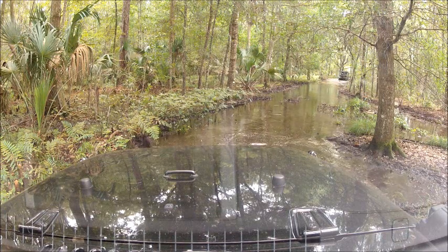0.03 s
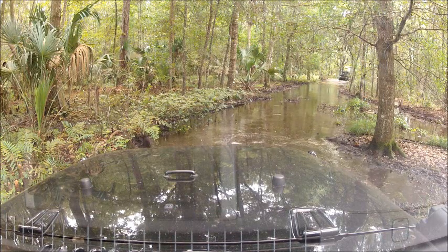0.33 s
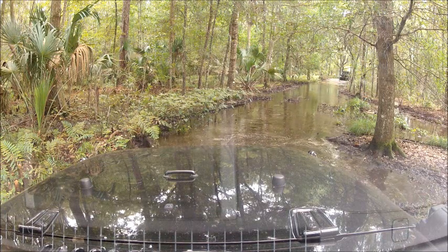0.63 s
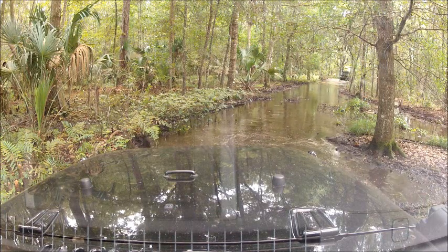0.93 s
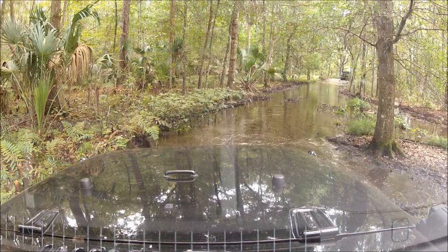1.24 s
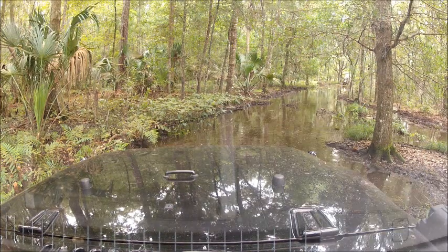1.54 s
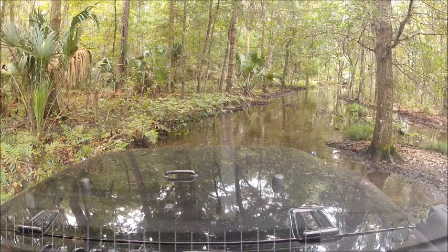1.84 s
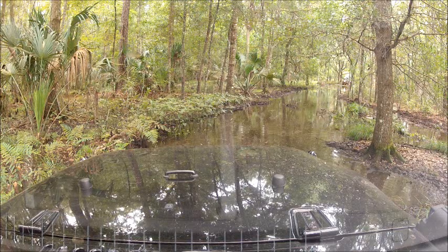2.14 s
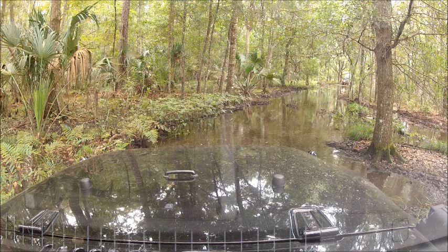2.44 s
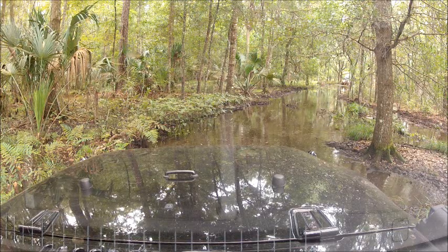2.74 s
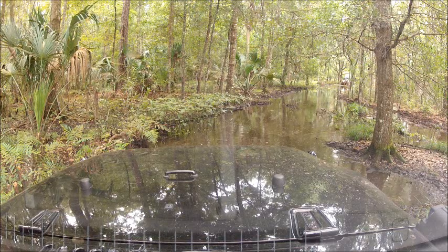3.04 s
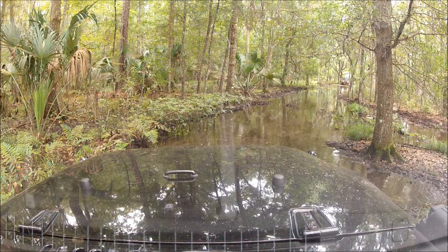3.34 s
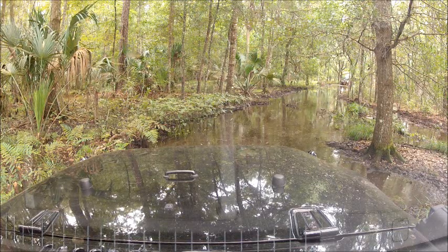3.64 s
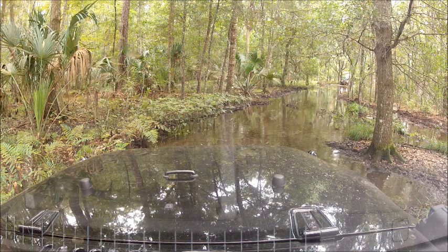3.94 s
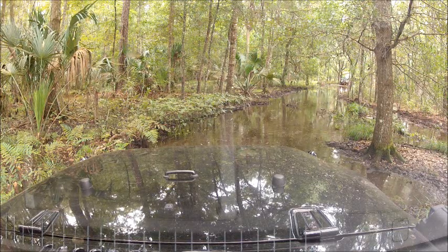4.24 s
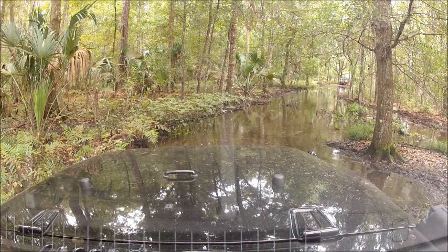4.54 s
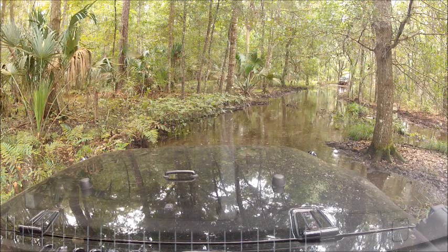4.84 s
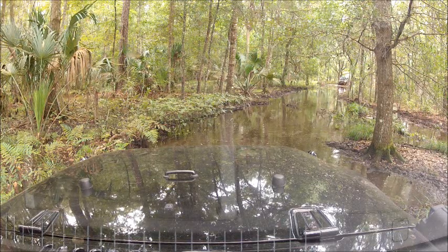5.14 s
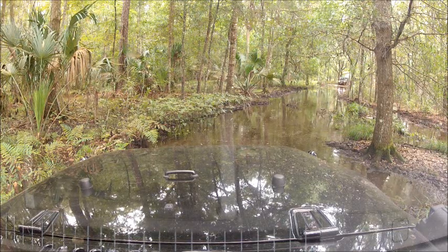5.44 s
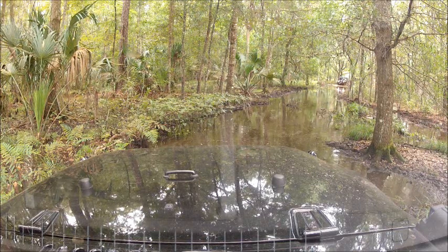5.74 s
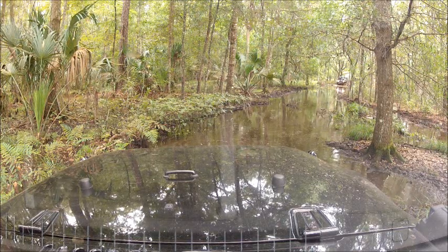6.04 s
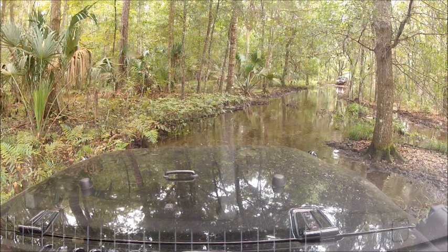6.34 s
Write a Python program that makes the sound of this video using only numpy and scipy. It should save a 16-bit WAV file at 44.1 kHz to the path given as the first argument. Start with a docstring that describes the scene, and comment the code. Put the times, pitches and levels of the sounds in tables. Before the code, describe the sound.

Heard on board, an off-road vehicle idles with light ticks and soft knocks until its door slams shut with a boom.

```python
"""A door slams on an idling off-road vehicle: panels ring, the latch snaps, fittings rattle, the cabin booms.
Before the slam, the sound cuts abruptly from a fast six-cylinder idle to a slower, quieter one.
Small parts tick, something rustles and the bodywork knocks softly over a faint hiss.
All is heard on board through a slow converter, whose images mirror the sound into the treble;
the slam overloads it."""
import sys
import numpy as np
from scipy import signal
from scipy.fft import rfft, irfft, next_fast_len
from scipy.io import wavfile
from scipy.ndimage import uniform_filter1d

SR = 44100
rng = np.random.default_rng(int(sys.argv[2]) if len(sys.argv) > 2 else 0)


def transcribe(u):
    """Save the signal u as a 16-bit wav file named by the first command-line argument.

    u: samples, shape (n,) or (channels, n), limited to [-1, 1]; the rate is SR.
    q: integer samples, one column per channel.
    """
    v = np.clip(np.atleast_2d(u).T, -1, 1)
    q = np.round(v * 32767).astype(np.int16)
    wavfile.write(sys.argv[1], SR, q)


N = 286666
T = np.arange(N) / SR
CUT_S, SLAM_S = 1.657, 5.252  # the sound cuts; the door shuts

# Noise spectra. Each row: frequency in Hz, relative spectral density in dB.
HISS_SPECTRUM = [(300, -27), (1200, 8.5), (2200, 0.5), (3700, 3), (5000, 3), (6000, -5)]
RUSTLE_SPECTRUM = [(700, -10), (1500, -1), (2050, 6), (2800, -1), (4500, 0), (6000, -7.5)]
TICK_SPECTRUM = [(500, -18), (1800, -11.5), (3300, -9), (4500, 1.5), (6000, -4)]
FAST_RUMBLE = [(8, -31), (30, -2), (65, -1.5), (140, -1), (220, -4.5), (330, -6.5), (390, -8), (560, -12),
               (820, -15.5), (1150, -24.5), (1700, -35), (4000, -41)]
SLOW_RUMBLE = [(8, -22), (30, -1), (65, 3.5), (110, -3.5), (250, -3), (330, -2), (410, -13.5), (500, -12.5),
               (680, -18), (830, -18.5), (1000, -26.5), (1300, -30), (1900, -38), (4000, -37)]
SHUDDER_SPECTRUM = [(20, -4), (45, 5.5), (90, 3.5), (150, 3), (200, -9), (330, -7), (430, -11.5),
                    (700, -23.5), (1100, -27), (1800, -37), (5000, -53)]
CLATTER_SPECTRUM = [(150, -6), (400, 9), (700, 3), (1100, 4), (1700, -3.5), (2600, -4), (3200, -1.5),
                    (3900, -0.5), (5000, -3), (6000, -6)]
# Normal modes. Each row: frequency in Hz, relative level in dB, time to decay by 60 dB in seconds.
SMALL_PART_MODES = [(467, -7, .05), (716, -8.5, 0.049), (1350, -17, 0.022), (2320, -10, 0.04),
                    (2910, -4, 0.035), (3170, -19, .1), (3650, -18.5, .1), (4970, -5.5, 0.054)]
CABIN_MODES = [(27.63, -6, 1.09), (57.05, -1.5, 0.47), (73.8, -5.5, 0.67), (89.6, -9.5, 0.735)]
LATCH_MODES = [(2164, -2, 0.058), (2694, -5, 0.073), (3000, -6, 0.026), (3360, -6, 0.042),
               (3550, -6.5, 0.054), (3853, -1.5, 0.073), (4080, -4, 0.057), (4460, -9, 0.023),
               (4900, -19, .05)]
PANEL_MODES = [(129, -11, 0.61), (160.9, -11.5, 0.46), (228.5, -10.5, 0.35), (273, -18, 0.17),
               (292, -4, 0.244), (315.4, -5.5, 0.21), (343, -3, 0.078), (480, -13, .1), (529, -13, 0.204),
               (672, -8, 0.11), (710, -10, 0.14), (794, -11, 0.14), (862, -16.5, 0.13), (1038, -13.5, 0.15),
               (1180, -13, 0.1), (1255, -12.5, 0.1), (1405, -12, 0.041)]
# Rustles, from scuff to tap. Each row: start in seconds, level in dB, rise time in seconds.
RUSTLES = [(2.03, -59, .03), (2.28, -49, .045), (2.372, -53, .015), (2.546, -48, .003)]
# Contacts of small parts, and of the latch. Each row: start in seconds, level in dB.
TICKS = [(.150, -47.5), (.236, -37), (0.333, -26), (.391, -46), (.639, -46), (.812, -49), (.846, -47),
         (1.253, -54), (1.724, -41), (3.52, -50)]
LATCH_HITS = [(5.2505, -19.5), (5.2550, -16), (5.2635, -28), (5.2905, -18.5), (5.2955, -29)]
# Hollow bumps of the bodywork. Each row: start in seconds, pitch in Hz, level in dB.
BUMPS = [(2.803, 343, -25.5), (2.957, 262, -30), (3.098, 289, -27), (5.435, 339.6, -11.5),
         (5.462, 250, -22), (5.497, 339, -18.5), (5.548, 356, -24.5), (6.036, 336, -31.5)]
# Hums of belt-driven parts. Each row: frequency in Hz, rms level in dB.
BELT_HUMS = [(147, -50.5), (183, -49.5), (220, -48), (293, -50), (390, -57), (513, -57.5)]
# Engine orders at each idle. Each row: multiple of the crank rate, rms level in dB.
FAST_ORDERS = [(2, -41), (3, -23.7), (4.5, -46.5), (6, -42.5), (7.5, -52), (9, -46.5), (16.5, -55)]
SLOW_ORDERS = [(2, -58), (3, -38), (4.5, -50), (6, -51), (10, -53), (15, -51)]
# The door meets latch and frame, then rebounds.
# Each row: start in seconds, panel level in dB, clatter level in dB.
DOOR_BLOWS = [(5.244, -22, -15.5), (5.252, -3.5, -11.5), (5.288, -17, -16), (5.362, -24.5, -32),
              (5.437, -19.5, -22.5), (5.498, -23.5, -26.5), (5.553, -30.5, -47)]


def undb(db):
    """Amplitude grows tenfold with every 20 dB."""
    return 10 ** (np.asarray(db) / 20)


def unit(x):
    """Normalisation to an rms of 1."""
    return x / np.sqrt(np.mean(x ** 2))


def filtered(x, gain):
    """Filtering multiplies the spectrum by gain(Hz); mirrored ends keep the edges smooth."""
    size = next_fast_len(N + 2 * SR)
    padded = np.pad(x, (SR, size - N - SR), mode="reflect")
    hz = np.arange(size // 2 + 1) * SR / size
    return irfft(rfft(padded) * gain(hz), size)[SR:SR + N]


def noise(spectrum, envelope=1):
    """White noise, amplitude-modulated and then spectrally shaped, with an rms of 1."""
    hz, db = np.transpose(spectrum)
    white = rng.standard_normal(N) * envelope
    return unit(filtered(white, lambda f: undb(np.interp(np.log(f + 1), np.log(hz), db))))


def drift(rate_hz):
    """Smoothed random steps give a fluctuation with an rms of 1."""
    step = int(SR / rate_hz)
    held = np.repeat(rng.standard_normal(N // step + 1), step)[:N]
    return unit(uniform_filter1d(uniform_filter1d(held, step), step))


def burst(start, rise_s, t60_s):
    """A transient's envelope: linear rise, then exponential decay, one second in all."""
    out, age = np.zeros(N + SR), T[:SR]
    decay = undb(-60 * np.clip((age - rise_s) / t60_s, 0, 2))
    out[int(start * SR):][:SR] = np.minimum(age / rise_s, 1) * decay
    return out[:N]


def strike(hits, modes, detune=0., contact_s=0.00016):
    """Each impact (s, dB) excites damped modes; a longer contact softens the attack."""
    out, age = np.zeros(N + SR), T[:SR]
    hz, db, t60 = np.transpose(modes)[:, :, None]
    envelopes = undb(db - 60 * np.minimum(age / t60, 3)) * np.minimum(age / contact_s, 1)
    for start, hit_db in hits:
        shift = detune * rng.standard_normal((len(modes), 1))  # by where the hit lands
        ring = envelopes * np.sin(2 * np.pi * hz * (1 + shift) * age)
        out[int(start * SR):][:SR] += undb(hit_db) * ring.sum(axis=0)
    return out[:N]


def hiss():
    """Broadband noise steps up at the cut and down when the door shuts."""
    level_db = np.select([T < CUT_S, T < SLAM_S], [-59.7, -56], -63.5)
    return noise(HISS_SPECTRUM) * undb(level_db)


def rustles():
    """The friction of light brushing gives fine-grained noise."""
    grains = noise(RUSTLE_SPECTRUM, envelope=undb(1.5 * drift(300)))
    return grains * sum(undb(db) * burst(start, rise, t60_s=.22) for start, db, rise in RUSTLES)


def ticks():
    """Light contacts radiate short scrapes; one also excites the modes of a small metal part."""
    clink_s, ring_db, scrape_db = 1.3442, -23, -37
    contacts = TICKS + [(clink_s, scrape_db)]
    scrapes = sum(undb(db) * burst(start, rise_s=.0016, t60_s=.082) for start, db in contacts)
    return scrapes * noise(TICK_SPECTRUM) + strike([(clink_s, ring_db)], SMALL_PART_MODES)


def bumps():
    """Soft, uneven contacts excite a damped panel resonance whose pitch wanders."""
    wander_rad, uneven = 0.59 * drift(110), undb(2 * drift(180))
    out = 0
    for start, hz, db in BUMPS:
        tone = np.sin(2 * np.pi * hz * (T - start) + wander_rad)
        out += undb(db) * burst(start, rise_s=.012, t60_s=.085) * tone
    return uneven * out


def belt_hums():
    """Steady rotation of belt-driven parts gives tones that waver slightly in level and phase."""
    out = 0
    for hz, db in BELT_HUMS:
        amplitude = np.sqrt(2) * undb(db + 2 * drift(6.06))
        out += amplitude * np.sin(2 * np.pi * hz * T + 0.66 * drift(6.96))
    return out


def idle(firing_hz, orders, spectrum, rumble_db, throb, waver_db):
    """Periodic firing gives tones at the crank orders and modulates the rumble of block and body."""
    firings = np.cumsum(firing_hz * (1 + .004 * drift(6))) / SR
    turns = firings / 3  # six cylinders fire three times a turn
    tones = 0
    for order, db in orders:
        phase = 2 * np.pi * (order * turns + rng.random())
        unsteady_db = drift(9.6) * waver_db * order / 3  # higher orders waver more
        tones += np.sqrt(2) * undb(db + unsteady_db) * np.sin(phase)
    swell = np.exp(throb * np.cos(2 * np.pi * firings))
    return tones + undb(rumble_db) * noise(spectrum, swell)


def engine():
    """Firing rate sets pitch. A cut, with a click, joins a fast idle to a slow one."""
    fast_hz, slow_hz, sag_hz_per_s = 44.8, 38.05, 1.4
    fast = idle(fast_hz, FAST_ORDERS, FAST_RUMBLE, rumble_db=-37.5, throb=.24, waver_db=.06)
    fast += belt_hums()
    sagging_hz = slow_hz - sag_hz_per_s * np.maximum(T - SLAM_S, 0)  # sags after the slam
    slow = idle(sagging_hz, SLOW_ORDERS, SLOW_RUMBLE, rumble_db=-36.5, throb=.13, waver_db=.4)
    click = undb(-15) * burst(CUT_S, rise_s=1 / SR, t60_s=.002)
    return np.where(T < CUT_S, fast, slow) - click


def fittings():
    """Rapid impacts of loose fittings merge into noise: a clatter at each blow and a longer buzz."""
    chatter = noise(CLATTER_SPECTRUM, envelope=undb(0.85 * drift(900)))
    clatter = sum(undb(db) * burst(start, rise_s=.0041, t60_s=.088) for start, _, db in DOOR_BLOWS)
    buzz = undb(-28.5) * burst(SLAM_S, rise_s=.025, t60_s=.52)
    return chatter * (clatter + buzz)


def cabin_boom():
    """Opposed impulses, the door's shove and the recoil, excite modes of cabin air and suspension."""
    shove, recoil = (5.2705, -6), (5.2985, -5)  # seconds, dB
    return strike([recoil], CABIN_MODES) - strike([shove], CABIN_MODES)


def door_slam():
    """Impact sets panels and body vibrating; the steel latch rings as it snaps over two catches."""
    blows = [(start, db) for start, db, _ in DOOR_BLOWS]
    panels = strike(blows, PANEL_MODES, detune=.0022, contact_s=.0032)
    latch = strike(LATCH_HITS, LATCH_MODES, detune=.003)
    rattle = fittings()
    shudder = undb(-12) * noise(SHUDDER_SPECTRUM) * burst(SLAM_S, rise_s=.081, t60_s=.72)
    return panels + latch + rattle + shudder + cabin_boom()


def scene():
    """The sources superpose at one microphone on the vehicle."""
    return (engine() + hiss() + ticks() + rustles() + bumps() + door_slam())[None]


def record(dry):
    """Sample-and-hold conversion mirrors the spectrum about its rate; loud crests saturate."""
    converter_hz, edge_hz, droop_hz, top_hz = 12000, 5480, 14300, 15800
    peak_db, peak_width_hz = 1.5, 1500

    def hold_response(f):
        """Holding gives a sinc response, here with a slight treble peak and a roll-off."""
        peak = undb(peak_db * np.exp(-((f - converter_hz) / peak_width_hz) ** 2))
        return peak * np.sinc(f / converter_hz) / np.sqrt(1 + (f / droop_hz) ** 22)

    band_limited = filtered(dry[0], lambda f: 1 / np.sqrt(1 + (f / edge_hz) ** 44))
    mirrored = band_limited * (1 + 2 * np.cos(2 * np.pi * converter_hz * T))
    overloaded = np.clip(filtered(mirrored, hold_response), -1, 1)
    lowpass = signal.ellip(8, .2, 70, top_hz, fs=SR, output="sos")
    return signal.sosfilt(lowpass, overloaded)[None]


dry = scene()
out = record(dry)
transcribe(out)
```